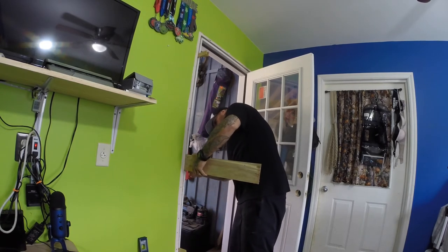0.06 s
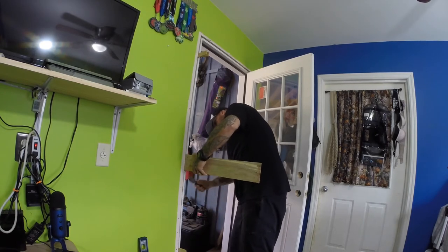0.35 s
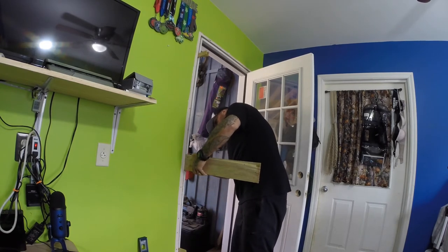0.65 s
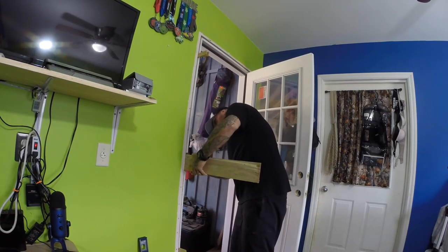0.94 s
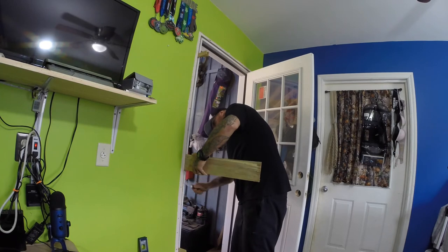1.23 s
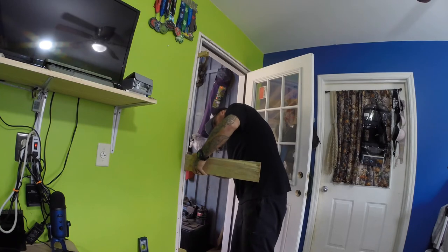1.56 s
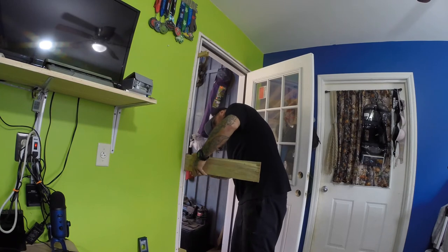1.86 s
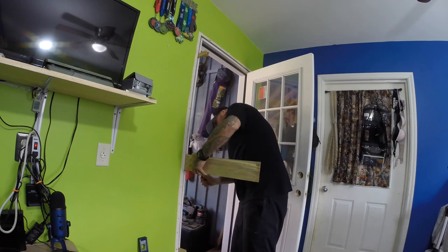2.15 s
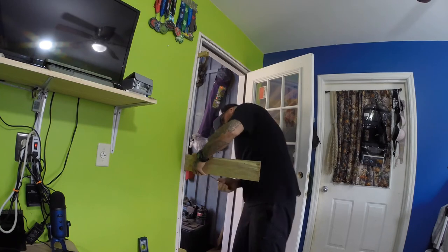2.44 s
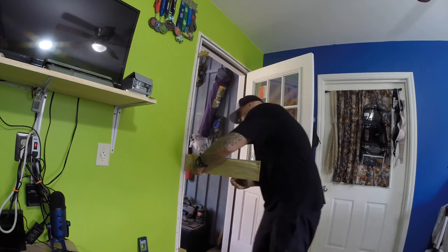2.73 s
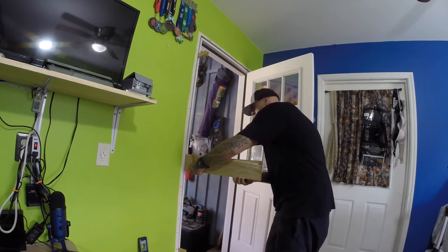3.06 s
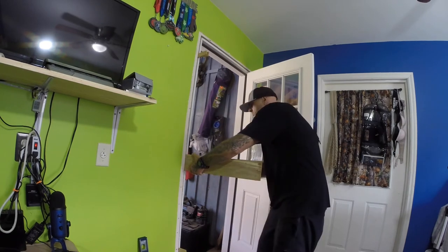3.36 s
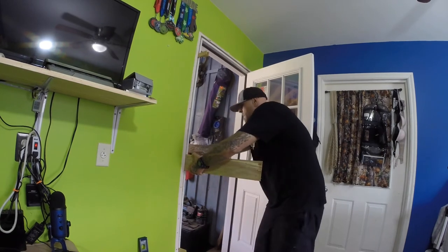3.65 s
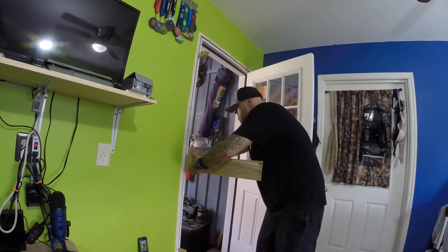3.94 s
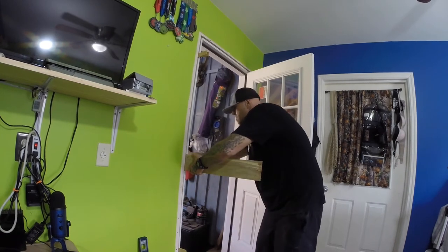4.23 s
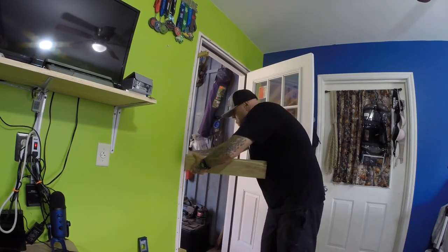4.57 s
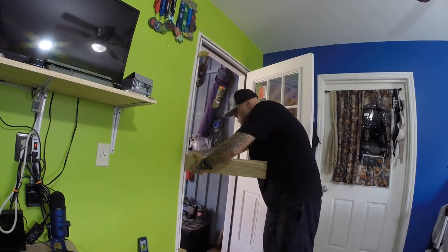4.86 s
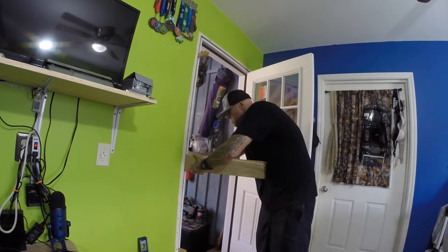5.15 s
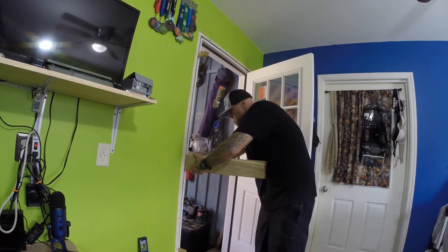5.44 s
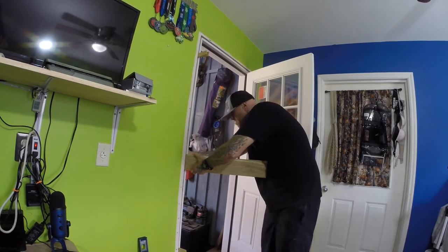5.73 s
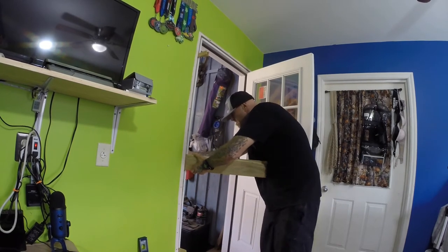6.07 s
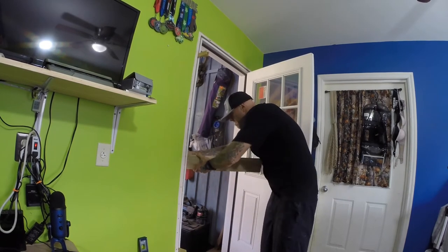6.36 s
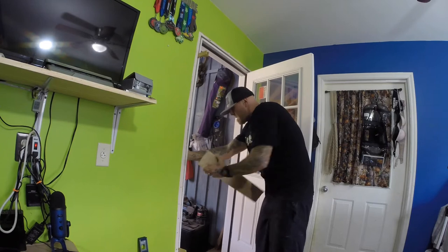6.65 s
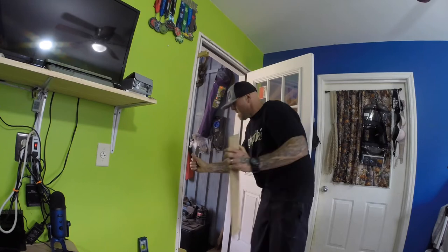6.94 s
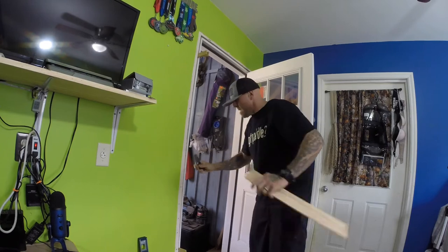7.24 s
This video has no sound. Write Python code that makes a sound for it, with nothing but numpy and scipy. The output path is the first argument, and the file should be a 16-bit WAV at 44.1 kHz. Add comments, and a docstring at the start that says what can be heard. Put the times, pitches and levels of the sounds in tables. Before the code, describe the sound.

Wooden shims are worked at a door frame with short scrapes, knocks and rubs, then splinter and break with a loud snap.

```python
"""Wooden shims worked at a door frame in a small room, a couple of metres from the microphone.
Three hard strokes and some soft rubs scrape as the grain catches and slips; knocks ring the frame
and set the door booming. Then the strips crack, fibre by fibre, and the last one breaks off,
so loud that the limiter ducks the room noise for about a second."""
import sys
import numpy as np
from scipy import signal
from scipy.fft import rfft, irfft, next_fast_len
from scipy.io import wavfile
from scipy.ndimage import uniform_filter1d, minimum_filter1d

SR = 44100
rng = np.random.default_rng(int(sys.argv[2]) if len(sys.argv) > 2 else 0)


def generate_wav(sig):
    """Save sig (samples, or channels by samples) to the path in sys.argv[1] as 16-bit PCM at SR."""
    pcm = np.round(np.clip(np.atleast_2d(sig).T, -1, 1) * 32767).astype(np.int16)
    wavfile.write(sys.argv[1], SR, pcm)


N = 326340
TIME = np.arange(N) / SR
FFT_SIZE = next_fast_len(N + SR, True)
FREQ = np.maximum(np.arange(FFT_SIZE // 2 + 1) * SR / FFT_SIZE, 1)
RING_FREQ = np.maximum(np.arange(SR // 4 + 1) * 2., 1)  # bins of a half-second ring


# Spectra of the scraped strip and of its hissing grain: freq_hz, level_db
SCRAPE_SPECTRUM = [(90, -4), (210, -3), (310, 0), (450, 2), (650, -4), (1000, -2.5), (1400, -10), (2000, 4),
                   (2700, -6.5), (3500, 0), (5000, -51), (7000, -22)]
GRAIN_SPECTRUM = [(2500, -22), (3600, 0.5), (4800, -4.5), (6300, -9.5), (7800, -17.5), (10500, -9.5),
                  (13500, -13), (15500, -26.5)]
# Hard strokes, placed along the frame: peak_s, drag_s, level_db, relative_hiss_db, place_fraction
HARD_STROKES = [(0.346, 0.058, -25.5, -7.5, .448), (1.248, 0.07, -21.5, -6, 0.49),
                (2.042, 0.054, -21, -4.5, .352)]

def strokes(frame_db=-5, rasp_db=-39.5, rasp_fade_db=-3, rasp_hz=4690, climb_hz_per_s=26000):
    """Hard scraping shakes the strip and rings the frame; the grain hisses and rasps on top."""
    drag = slips(per_s=3000, spread_db=3, judder_db=2, judder_per_s=240)
    strip = unit(shape(drag, colour(SCRAPE_SPECTRUM)))
    grain = slips(per_s=5500, spread_db=2.5, judder_db=4, judder_per_s=200)
    hiss = unit(shape(grain, colour(GRAIN_SPECTRUM)))
    out = np.zeros(N)
    for s, drag_s, db, hiss_db, place in HARD_STROKES:
        frame = unit(signal.fftconvolve(drag, blow(frame_response(place)))[:N])
        wood = unit(strip + undb(frame_db) * frame)
        pressure = push(s, drag_s, in_db_per_s=350.5, growth_db=8.5, out_db_per_s=448.5, bite_db=8.5)
        # The hiss follows speed more than pressure, so it comes in without a jump.
        speed = push(s, drag_s, in_db_per_s=422, growth_db=11.5, out_db_per_s=446)
        out += undb(db) * (wood * pressure + undb(hiss_db) * hiss * speed)
        # The rasp sounds as the stroke slides in, then climbs along the strip.
        pitch_hz = rasp_hz + climb_hz_per_s * np.clip(TIME - s + drag_s, 0, drag_s)
        rasp = unit(resonate(drag, pitch_hz, width_hz=330))
        rasp *= push(s, drag_s, in_db_per_s=518, growth_db=rasp_fade_db, out_db_per_s=446)
        out += undb(rasp_db + rasp_fade_db) * rasp
    return out


def slips(per_s, spread_db, judder_db, judder_per_s):
    """Friction: tiny slips of uneven size that swell and sink as the grain catches and lets go."""
    sizes = undb(spread_db * np.minimum(rng.exponential(size=N), 4))
    signs = rng.choice([-1, 1], N)
    slipping = rng.random(N) < per_s / SR
    return sizes * signs * slipping * undb(judder_db * walk(judder_per_s))


def push(peak_s, drag_s, in_db_per_s, growth_db, out_db_per_s, bite_db=0):
    """Gain of a stroke: it slides in, bites, changes steadily through the drag and lets go."""
    bite_s = peak_s - drag_s
    sliding = np.where(TIME < bite_s, bite_db + in_db_per_s * (bite_s - TIME), 0)
    dragging = growth_db * np.clip((peak_s - TIME) / drag_s, 0, 1)
    leaving = out_db_per_s * np.maximum(TIME - peak_s, 0)
    return undb(-np.minimum(sliding + dragging + leaving, 140))


# Modes of the shim: pitch_hz, width_hz, level_db
SHIM_MODES = [(760, 270, -8.5), (2084, 430, -3), (2990, 760, 1.5), (3965, 720, 6), (5400, 2900, -6),
              (6976, 2700, -16), (9450, 1300, -12.5), (12200, 4300, -14)]
# Spectrum of splintering wood: freq_hz, level_db
SPLINTER_SPECTRUM = [(60, -17.5), (170, -13), (350, -15.5), (600, -9.5), (880, -3), (1300, -4.5),
                     (2400, -2), (4400, -0.5), (6500, -7), (8300, -11.5), (10500, -11.5), (14000, -18),
                     (16000, -31)]
# Fibres giving way: start_s, peak_db, relative_splinter_db
FIBRE_CRACKS = [(1.1791, -18, -22), (1.2455, -18.5, -17), (1.647, -41, -13.5), (3.478, -43.5, -6),
                (4.6592, -2.5, -19), (5.095, -46.5, -5.5), (5.229, -38.5, -11), (5.2922, -9.5, -18.5),
                (5.471, -46.5, -8.5), (5.6653, -2, -19), (5.7428, -7, -19.5), (5.845, -33.5, -17),
                (5.996, -29.5, -17), (6.029, -40.5, -13.5), (6.072, -38, -14.5), (6.105, -36.5, -18),
                (6.1316, 0, -17.5), (6.1402, -8.5, -13.5), (6.164, -2.5, -12), (6.175, -11.5, -34.5),
                (6.191, -0.5, -45), (6.1929, 10.5, -44.5)]

def cracks(travel_s=0.0006, slowest_hz=1200, return_s=0.00045, return_db=-7, room_db=-6,
           splinter_s=0.015):
    """Each crack is one sharp release that rings the shim, then a dying crackle of splinters."""
    releases, tearing = np.zeros((2, N))
    dying = np.exp(-TIME[:SR // 10] / splinter_s)
    for s, db, splinter_db in FIBRE_CRACKS:
        add(releases, s, undb([db]))
        # A new crack takes the strain off and cuts the earlier splintering short.
        tearing[int(s * SR):][:len(dying)] = undb(db + splinter_db) * dying
    # Bending waves carry the treble ahead of the lows.
    strongest_hz = SHIM_MODES[3][0]
    bending = np.exp(-4j * np.pi * travel_s * np.sqrt((RING_FREQ + slowest_hz) * strongest_hz))
    # The wave returns from the wedged end and hollows the spectrum into woody humps.
    wedged_end = 1 + undb(return_db) * np.exp(-2j * np.pi * RING_FREQ * return_s)
    snap = blow(ringing(SHIM_MODES) * bending * wedged_end)
    crackle = tearing * unit(slips(per_s=3600, spread_db=-0.5, judder_db=3, judder_per_s=780))
    reverb = undb(room_db) * echoes(np.linalg.norm(snap) * releases + crackle)
    # Splinters and echoes have a broader spectrum than the snap beamed at the microphone.
    broad = unit(colour(SPLINTER_SPECTRUM))
    return signal.fftconvolve(releases, snap)[:N] + shape(crackle + reverb, broad)


# Modes of the door: pitch_hz, width_hz, level_db
DOOR_MODES = [(38, 4.4, -3.5), (62, 10, 1.5), (85, 37, -6), (114, 22, -7), (146, 17, -1), (205.8, 12, 1),
              (282, 91, -8)]
# Knocks along the frame: start_s, peak_db, brightness_hz, place_fraction, boom_db
FRAME_KNOCKS = [(0.2902, -27, 3020, .5, -65), (.341, -15, 2630, 0.24, -51), (1.177, -14, 4300, .5, -59),
                (1.24, -18, 2500, 0.58, -43), (1.646, -38, 2200, 0.457, -45),
                (1.699, -47, 1100, 0.4, -47.5), (1.995, -18.5, 4090, .35, -47), (3.033, -69, 220, .4, -41),
                (3.691, -17.5, 2110, 0.29, -46), (3.716, -24.5, 1130, 0.29, -32.5),
                (3.79, -35, 1210, 0.29, -32), (3.838, -17, 1390, 0.41, -44), (3.847, -28, 830, 0.48, -16),
                (3.92, -21, 1330, .42, -25.5), (3.971, -31.5, 1040, 0.6, -29.5),
                (4.065, -52.5, 400, .5, -47), (4.121, -30.5, 1130, 0.27, -48), (4.149, -42, 700, 0.36, -62),
                (4.2, -43.5, 786, 0.28, -72), (6.192, -11, 2384, 0.45, -26.5)]

def knocks(boom_lag_s=0.004, boom_cutoff_ratio=0.46, clatter_db=-1, clatter_s=0.0098):
    """Blows ring the frame with a short clatter, then the door booms; soft contact dulls both."""
    out, t, door = np.zeros(N), TIME[:SR // 20], ringing(DOOR_MODES)
    for s, db, brightness_hz, place, boom_db in FRAME_KNOCKS:
        clatter = unit(rng.standard_normal(len(t)) * np.exp(-t / clatter_s))
        contact = undb(clatter_db) * clatter / np.sqrt(len(t))
        contact[0] = 1  # the blow itself
        ring = signal.fftconvolve(blow(frame_response(place)), contact)
        knock = signal.sosfilt(signal.butter(4, brightness_hz, fs=SR, output="sos"), ring)
        add(out, s, undb(db) * knock / np.abs(knock).max())
        boom = blow(door / (1 + 1j * RING_FREQ / (boom_cutoff_ratio * brightness_hz)) ** 2)
        add(out, s + boom_lag_s, undb(boom_db) * boom)
    return out


# Modes of the door frame: pitch_hz, width_hz, level_db
FRAME_MODES = [(213, 63, -7.5), (386, 33, 3.5), (652.5, 90, 1), (731, 18, 4), (844, 68, -3),
               (993, 130, -4.5), (1370, 660, -2.5), (1880, 300, -5.5), (2154, 140, -6), (3380, 710, -7.5),
               (4600, 360, -10.5)]

def frame_response(place, node_gain=0.63):
    """The frame touched at a fraction of its length: modes with a node there ring less."""
    return ringing([(hz, width, db + 20 * np.log10(node_gain + abs(np.sin(np.pi * k * place))))
                    for k, (hz, width, db) in enumerate(FRAME_MODES, 1)])


# Spectrum of wood sliding lightly on wood: freq_hz, level_db
RUB_SPECTRUM = [(180, -26.5), (300, 0.5), (744, 3.5), (1000, -2.5), (1350, 0.5), (2320, 0.5), (2790, 0),
                (3510, -4), (6050, -13), (11300, -17), (15500, -34.5)]
# Rubs; those after the last crack draw the broken strip out:
# peak_s, rise_s, fall_s, level_db, relative_hiss_db
LIGHT_RUBS = [(.88, .03, .04, -60, -14), (1.045, 0.13, .15, -61, -1), (1.93, 0.15, .03, -58, 0.5),
              (2.33, 0.024, .04, -57, -27), (2.424, 0.028, .06, -55, -2), (2.63, 0.48, .25, -55, -6),
              (2.776, 0.12, .05, -49.5, -2.5), (2.895, 0.074, .08, -50, -3.5),
              (2.991, 0.046, .07, -39, -7.5), (3.258, 0.066, .04, -50, -4),
              (3.484, 0.019, 0.098, -49.5, -1.5), (3.647, 0.025, 0.14, -45, -13),
              (3.744, 0.11, .16, -33.5, -18), (3.837, 0.053, .1, -42.5, -22),
              (3.925, .02, 0.091, -52.5, -16), (4.05, 0.067, 0.21, -47.5, -31),
              (4.655, 0.046, .01, -35.5, 1), (5.17, 0.27, 0.11, -57, -14.5),
              (5.138, 0.012, 0.037, -52, -25), (5.23, 0.021, .05, -53, -11), (5.603, 0.0089, .14, -48.5, 0),
              (6.07, .12, .08, -61.5, 1.5), (6.256, .07, 0.11, -34.5, -12),
              (6.325, .08, 0.064, -32.5, -6.5), (6.66, 0.11, .2, -59.5, -9.5), (6.92, 0.091, .08, -65.5, 4)]

def rubs():
    """Light rubbing: fine slips that hardly move the frame, with some hiss from the grain."""
    drag = slips(per_s=4600, spread_db=1.5, judder_db=3, judder_per_s=70)
    wood = unit(shape(drag, colour(RUB_SPECTRUM)))
    grain = slips(per_s=7000, spread_db=3, judder_db=2.5, judder_per_s=440)
    hiss = unit(shape(grain, colour(GRAIN_SPECTRUM)))
    return sum(undb(db) * swell(s, rise_s, fall_s) * (wood + undb(hiss_db) * hiss)
               for s, rise_s, fall_s, db, hiss_db in LIGHT_RUBS)


# The strip catching on one note: middle_s, length_s, pitch_hz, level_db
STRIP_SQUEAKS = [(0.349, 0.026, 2050, -22.5), (0.355, 0.057, 600, -25.5), (1.237, 0.053, 630, -27),
                 (2.424, .04, 2360, -51), (2.913, 0.096, 2380, -52.5), (2.99, 0.062, 1550, -45),
                 (3.021, 0.049, 3520, -40), (3.508, 0.12, 2340, -44), (5.14, 0.03, 1500, -47),
                 (5.184, 0.059, 4800, -53), (6.638, 0.06, 3880, -61.5), (6.681, 0.13, 1767, -59)]

def squeaks(q=6):
    """Brief rasps: the slips feed one resonance of the strip."""
    drag = slips(per_s=4000, spread_db=4.5, judder_db=4.5, judder_per_s=120)
    out = np.zeros(N)
    for middle_s, length_s, hz, db in STRIP_SQUEAKS:
        start_s, count = middle_s - length_s / 2, int(length_s * SR)
        rasp = signal.lfilter(*signal.iirpeak(hz, q, fs=SR), drag[int(start_s * SR):][:count])
        add(out, start_s, undb(db) * unit(rasp) * np.hanning(count))
    return out


# Weight shifting on the floor: peak_s, rise_s, fall_s, level_db
WEIGHT_SHIFTS = [(3.06, .04, .3, -53), (3.969, 0.12, 0.11, -38), (6.305, .05, 0.14, -44)]

def rumble(soft_hz=60):
    """Shifting weight shakes the low modes of the door, with no attack."""
    door = blow(ringing(DOOR_MODES) / (1 + 1j * RING_FREQ / soft_hz))
    shaking = unit(signal.fftconvolve(rng.standard_normal(N), door)[:N])
    return shaking * sum(undb(db) * swell(s, rise, fall) for s, rise, fall, db in WEIGHT_SHIFTS)


# Decay of the small room: freq_hz, t60_s
ROOM_DECAY = [(100, 0.68), (700, 0.24), (2000, 0.28), (4000, 0.31), (12000, 0.23)]

def echoes(x, bass_side=0.8, mid_side=0.46, treble_side=1.0, near_db=3, near_s=0.02):
    """Close wall and door answer first, then a tail that dulls; each call has its own echo pattern."""
    t = TIME[:SR * 3 // 4]
    mid, side = rfft(rng.standard_normal((2, len(t))))
    octave = np.log2(np.clip(np.arange(len(mid)) * SR / len(t), 64, 16384))
    width = np.interp(octave, np.log2([80, 200, 4500, 8000]), [bass_side, mid_side, mid_side, treble_side])
    noise = mid + width * side * np.array([[1], [-1]])
    hz, t60 = np.transpose(ROOM_DECAY)
    tail = 0
    for k in range(6, 15):
        band = irfft(noise * np.maximum(1 - abs(octave - k), 0), len(t))
        tail += band * np.exp(-np.log(1000) * t / np.interp(k, np.log2(hz), t60))
    near_walls = 1 + undb(near_db) * np.exp(-t / near_s)
    onset = np.clip(t / 0.0044 - 0.5, 0, 1)
    room = unit(tail * near_walls * onset) / np.sqrt(len(t))
    return signal.fftconvolve(x[None], room, axes=1)[:, :N]


# Room tone at the microphone: freq_hz, level_db
ROOM_TONE_SPECTRUM = [(13, -38.5), (22, 2), (97, -4), (135, -10), (182, -10), (306, -17), (679, -22.5),
                      (1050, -27.5), (1350, -28), (1980, -28), (2150, -30), (2680, -30), (3070, -31),
                      (14300, -37.5), (15500, -39.5)]

def room_tone(level_db=-54.5, bass_side=0.42, treble_side=0.3, waver_db=0.42,
              whine_hz=10700, whine_db=-81):
    """Room rumble and faint hiss, a little wider in the bass, with a thin electrical whine."""
    mid, side = rng.standard_normal((2, N)) * undb(waver_db * walk(per_s=27))
    width = np.interp(np.log(FREQ), np.log([100, 6000]), [bass_side, treble_side])
    stereo = mid + shape(side, width) * np.array([[1], [-1]])
    noise = unit(shape(stereo, colour(ROOM_TONE_SPECTRUM)))
    return undb(level_db) * noise + undb(whine_db) * np.sin(2 * np.pi * whine_hz * TIME)


def swell(peak_s, rise_s, fall_s, edge_db=21, roundness=1.016):
    """Gain of a light movement: up by edge_db over the rise, down as much over the fall."""
    away = np.maximum((peak_s - TIME) / rise_s, (TIME - peak_s) / fall_s)
    gain, heard = np.zeros(N), away < 4
    gain[heard] = undb(-edge_db * away[heard] ** roundness)
    return gain


def ringing(modes):
    """Frequency response of a body; neighbouring modes move in opposite directions."""
    return sum((-1) ** k * undb(db) / (1 + 1j * (RING_FREQ / hz - hz / RING_FREQ) * hz / width)
               for k, (hz, width, db) in enumerate(modes))


def blow(response):
    """One blow on a body, peak 1."""
    ring = irfft(response)
    return ring / np.abs(ring).max()


def resonate(x, hz, width_hz):
    """A resonance whose centre moves from sample to sample."""
    turn = np.exp(2j * np.pi * np.cumsum(hz) / SR)
    pole = np.exp(-np.pi * width_hz / SR)
    return np.real(turn * signal.lfilter([1], [1, -pole], x / turn))


def colour(points):
    """Response through (Hz, dB) points, falling steeply outside them."""
    hz, db = np.transpose(points)
    roll_off = np.sqrt((1 + (0.7 * hz[0] / FREQ) ** 6) * (1 + (FREQ / hz[-1] / 1.3) ** 8))
    return undb(np.interp(np.log(FREQ), np.log(hz), db)) / roll_off


def shape(x, response):
    """Filter by a frequency response."""
    return irfft(rfft(x, FFT_SIZE) * response, FFT_SIZE)[..., :N]


def walk(per_s):
    """Glide between random levels, rms 1."""
    hold = int(SR / per_s)
    steps = np.repeat(rng.standard_normal(N // hold + 1), hold)[:N]
    return unit(uniform_filter1d(steps, hold))


def undb(db):
    """Decibels to gain."""
    return 10 ** (np.asarray(db) / 20)


def unit(x):
    """Scale to rms 1."""
    return x / np.sqrt(np.mean(x ** 2))


def add(track, s, sound):
    """Mix a sound in at time s."""
    i = int(s * SR)
    track[i:i + len(sound)] += sound[:N - i]


def scene(friction_direct_db=-3, friction_room_db=-4, blows_room_db=-1):
    """The work at the door and its echoes, balanced as heard from a couple of metres away."""
    friction = strokes() + rubs() + squeaks()
    blows = knocks() + rumble()
    reverb = undb(friction_room_db) * echoes(friction) + undb(blows_room_db) * echoes(blows)
    return undb(friction_direct_db) * friction + blows + reverb + cracks() + room_tone()


def record(dry, ceiling_db=-0.13, hold_s=0.33, release_db_per_s=17, clip_level=0.85, top_hz=15800):
    """A limiter ducks a little too late, holds and recovers; the overshoot clips and the top is cut."""
    over_db = np.maximum(20 * np.log10(np.abs(dry).max(axis=0) + 1e-9) - ceiling_db, 0)
    ahead, attack, half_hold = SR // 210, SR // 56, int(hold_s * SR / 2)  # samples
    held_db = -minimum_filter1d(-over_db, 2 * half_hold + 1, origin=half_hold - ahead)
    recovery_db = release_db_per_s * TIME
    duck_db = np.maximum.accumulate(held_db + recovery_db) - recovery_db
    limited = np.clip(dry * undb(-uniform_filter1d(duck_db, attack)), -clip_level, clip_level)
    return signal.sosfilt(signal.ellip(8, 0.2, 70, top_hz, fs=SR, output="sos"), limited)


dry = scene()
out = record(dry)
generate_wav(out)
```